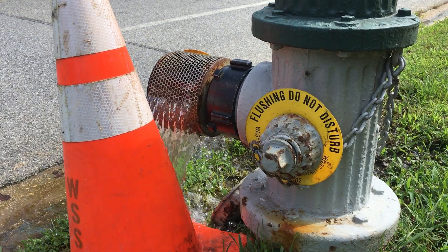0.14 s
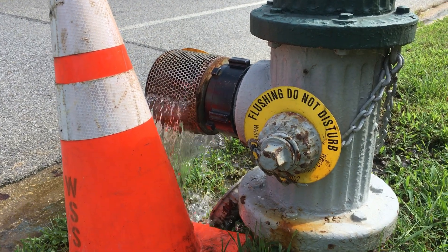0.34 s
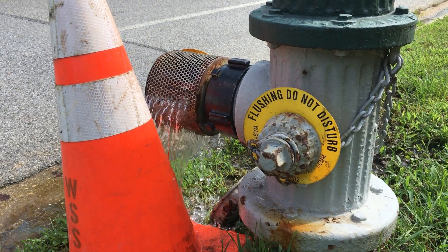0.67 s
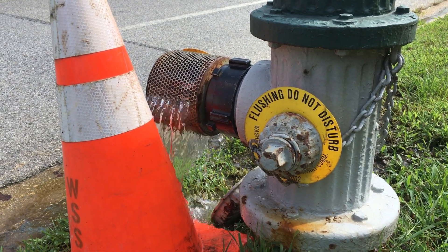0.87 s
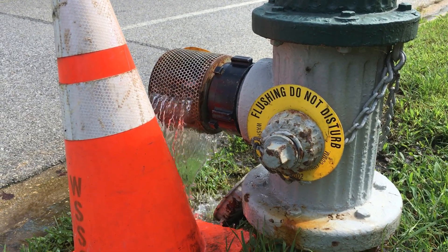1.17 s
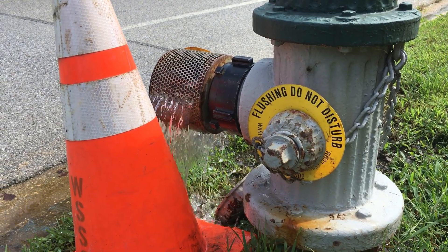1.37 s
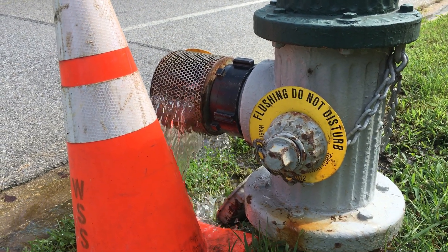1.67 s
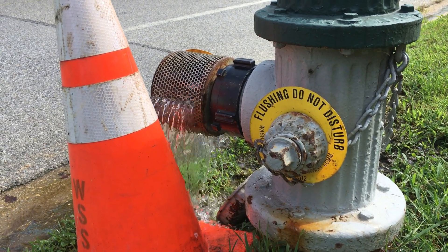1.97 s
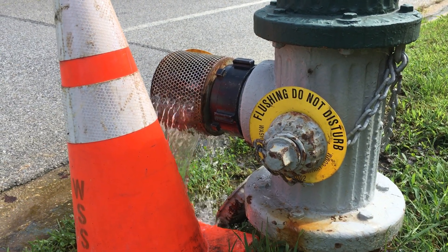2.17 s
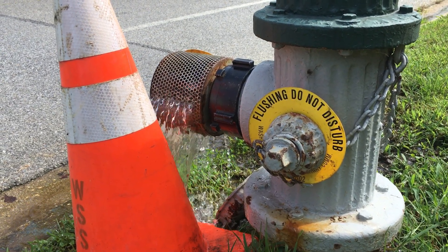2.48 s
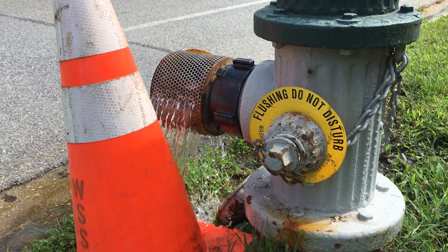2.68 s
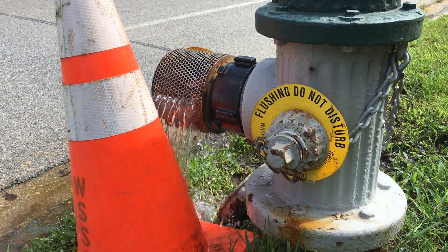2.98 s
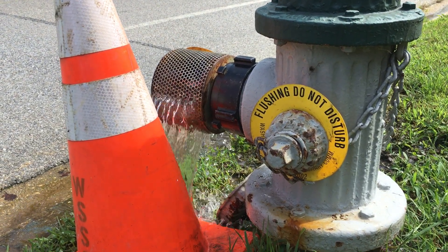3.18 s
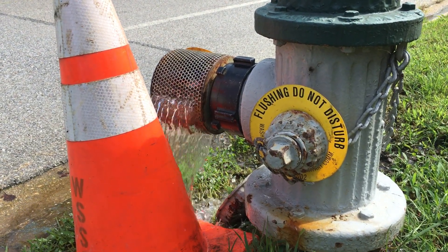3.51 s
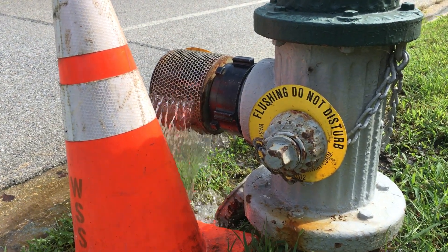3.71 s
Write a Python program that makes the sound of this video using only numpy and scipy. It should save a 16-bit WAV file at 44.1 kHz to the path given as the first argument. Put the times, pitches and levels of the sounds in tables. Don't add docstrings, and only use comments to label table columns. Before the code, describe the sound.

Water rushes steadily from a mesh-capped iron hydrant for nearly four seconds, close to a mono microphone outdoors. Turbulence gives a hollow, metallic ringing around a bright, flickering hiss. Fine droplets tick densely and larger drops crackle throughout, more sparsely after 3.1. Faint bubble pops come near 1.3 and 3.0. Low wind bumps peak around 1.8-2.1, then fade, over a very quiet distant hum.

```python
import sys
import numpy as np
from scipy import signal
from scipy.fft import rfft, irfft, next_fast_len
from scipy.io import wavfile
from scipy.ndimage import uniform_filter1d

SR = 44100
rng = np.random.default_rng(int(sys.argv[2]) if len(sys.argv) > 2 else 0)


def attenuation_scalar(level_db):
    decades = np.asarray(level_db, float) / 20
    return 10 ** decades


def unload_wav(signal):
    wavfile.write(
        sys.argv[1],
        SR,
        np.round(np.clip(np.atleast_2d(signal).T, -1, 1) * 32767).astype(np.int16),
    )


N = 169785


def evened(x):
    return x / np.sqrt(np.mean(x ** 2) + 1e-20)


def noise():
    return rng.standard_normal(N)


def curve(points):
    t_s, value = np.transpose(points)
    return np.interp(np.arange(N) / SR, t_s, value)


def colour(x, gain):
    size = next_fast_len(len(x))
    f_hz = np.fft.rfftfreq(size, 1 / SR)
    return irfft(rfft(x, size) * gain(f_hz), size)[:len(x)]


def table(points):
    f_hz, level_db = np.transpose(points)
    log_f = np.log(np.r_[f_hz[0] / 2, f_hz, f_hz[-1] * 1.5])
    level_db = np.r_[level_db[0] - 30, level_db, level_db[-1] - 24]
    return lambda hz: attenuation_scalar(np.interp(np.log(hz + 1), log_f, level_db))


def drift(top_hz, low_hz):
    count, stride = 8192, 32
    hz = np.fft.rfftfreq(count, stride / SR)
    gain = hz / (hz + low_hz) / np.sqrt(hz + 1) / (1 + (hz / top_hz) ** 4)
    slow = irfft(rfft(rng.standard_normal(count)) * gain)
    return evened(np.interp(np.arange(N) / stride, np.arange(count), slow))


def add(mix, t_s, sound):
    part = mix[round(t_s * SR):][:len(sound)]
    part += sound[:len(part)]


def hum():
    # [f/Hz, level/dB]
    hum_colour = [(60, -6.5), (130, -2), (210, -3.5), (280, -12), (330, -9.5), (390, -16), (480, -12),
                  (560, -17.5)]
    return attenuation_scalar(-61.5) * evened(colour(noise(), table(hum_colour)))


def breeze():
    # [t/s, level/dB]
    breeze_level = [(0, -56), (.3, -54.5), (.6, -51), (.9, -55.5), (1.1, -58), (1.25, -53.5), (1.42, -53),
                    (1.55, -49.5), (1.8, -53.5), (1.85, -41), (2.0, -43.5), (2.09, -56), (2.12, -58),
                    (2.28, -53), (2.37, -58), (2.85, -53.5), (3.15, -57), (3.85, -59.5)]
    # [f/Hz, density/dB per Hz]
    rumble_colour = [(15, -6), (40, -2.5), (80, -6), (130, -11), (200, -19.5), (300, -25.5)]
    lumps_db, lumps_hz, steadiness = 1.5, 25, 0.66
    rumble = evened(colour(noise(), table(rumble_colour)))
    rumble /= (uniform_filter1d(rumble ** 2, size=2500) + 0.039) ** (steadiness / 2)
    return evened(rumble) * attenuation_scalar(curve(breeze_level) + lumps_db * drift(lumps_hz, low_hz=5 * 0.084))


def eddies():
    # [t/s, peak level/dB, swing rate/Hz, length/s]
    eddy_events = [(0.287, -48.5, 70, 0.043), (.575, -43.5, 45.5, .05), (.835, -42, 93, 0.024),
                   (0.917, -48.5, 60, 0.041), (1.21, -42, 50, .05), (1.521, -44, 71, 0.033),
                   (1.58, -42.5, 59.4, .035), (1.657, -43, 70, 0.033), (1.725, -41, 70, .03),
                   (1.799, -44, 163, .022), (1.818, -30, 85, 0.027), (1.83, -30, 202, .026),
                   (1.856, -34, 55, 0.026), (1.866, -36, 45, 0.0255), (1.897, -33.5, 108, 0.0201),
                   (1.93, -35.5, 50, 0.032), (1.955, -34, 60, 0.0245), (1.981, -30, 101, 0.0218),
                   (2.001, -37.5, 80, 0.0212), (2.025, -40, 70, 0.031), (2.058, -36.5, 129, .018),
                   (2.072, -37.5, 55, .024), (2.23, -40.5, 60, 0.041), (2.275, -36.5, 69, .03),
                   (2.305, -40, 81, .03), (2.433, -46, 59.6, 0.027), (2.513, -45, 59.5, 0.03),
                   (2.63, -38.5, 44.5, 0.036), (2.836, -52, 59.5, 0.038), (2.985, -44.5, 54.7, 0.04)]
    quicken, roughness, peak_power = 1.8, 0.16, 0.69
    overtone_db, overtone_ratio = -3, 1.62
    out = np.zeros(N)
    for t_s, peak_db, swing_hz, length_s in eddy_events:
        u = np.arange(0, length_s, 1 / SR) / length_s
        wobble = evened(uniform_filter1d(rng.standard_normal(4000), size=300))[:len(u)]
        rate_hz = swing_hz * quicken ** (2 * u - 1) * np.exp(roughness * wobble)
        phase = 2 * np.pi * (np.cumsum(rate_hz) / SR - swing_hz * length_s / 2)
        swing = np.cos(phase) + attenuation_scalar(overtone_db) * u * np.cos(overtone_ratio * phase)
        envelope = np.sin(np.pi * u ** peak_power) ** 2
        add(out, t_s, -attenuation_scalar(peak_db) * envelope * swing)
    return out


def bubbles():
    # [t/s, peak level/dB, pitch/Hz]
    bubble_events = [
        (1.270, -46, 3300),
        (1.424, -56, 3400),
        (2.29, -56, 3360),
        (3.04, -51, 3380),
    ]
    decay_s, rise, trim_db = 0.0017, 0.1, -5
    out = np.zeros(N)
    u = np.arange(900) / SR / decay_s
    for t_s, peak_db, pitch_hz in bubble_events:
        turns = pitch_hz * decay_s * u * (1 + rise * (u - 2) / 10)
        ping = u * np.exp(1 - u) * np.sin(2 * np.pi * turns)
        add(out, t_s, attenuation_scalar(peak_db + trim_db) * ping)
    return out


def splats():
    # [t/s, peak level/dB, pitch/Hz]
    splat_events = [(0.0223, -33.5, 12700), (0.087, -27, 11800), (0.2249, -28, 8900), (0.3037, -28, 13200),
                    (0.4509, -32, 12000), (0.5811, -37, 11400), (0.8694, -43, 10900),
                    (0.9394, -31.5, 11500), (1.1288, -35, 11500), (1.2391, -27, 11600), (1.4096, -33, 9400),
                    (1.5708, -34, 11300), (1.6773, -36, 7770), (1.701, -32.5, 10900),
                    (1.8094, -33.5, 11300), (2.1146, -42, 11600), (2.2074, -30, 11600), (2.236, -31, 9350),
                    (2.381, -31, 9350), (2.4084, -34, 11600), (2.4645, -30, 11100), (2.6493, -31.5, 10500),
                    (2.73, -38, 7860), (2.8848, -26, 11100), (2.9377, -36, 12600), (2.946, -28, 11200),
                    (2.996, -29, 11800), (3.0804, -35, 11900), (3.4201, -36, 11600), (3.6112, -36, 9180)]
    decay_s, width_hz, trim_db = 0.00084, 2250, -10.5
    out, t = np.zeros(N), np.arange(400) / SR
    for t_s, peak_db, pitch_hz in splat_events:
        crackle = colour(rng.standard_normal(400), lambda f: np.exp(-((f - pitch_hz) / width_hz) ** 2))
        burst = crackle * t * np.exp(-t / decay_s)
        add(out, t_s, attenuation_scalar(peak_db + trim_db) * burst / abs(burst).max())
    return out


def droplets():
    # [f/Hz, level/dB]
    drop_colour = [(4000, -23), (6500, -22), (8500, -7.5), (10000, -8), (11500, -3), (13200, -6.5),
                   (15500, -42)]
    drops_per_s, spread_db, clump_db = 2200, 4, 4
    pitches_hz, decay_cycles = np.geomspace(7000, 15400, 24), 3.7 * 0.87
    scatter_db, scatter_s = -4, 0.003
    spread = np.minimum(rng.exponential(1, N), 4.5)
    strike = attenuation_scalar(spread_db * spread + clump_db * drift(120, low_hz=5))
    strike *= rng.random(N) < drops_per_s / SR
    kind = rng.integers(0, len(pitches_hz), size=N)
    drops = np.zeros(N)
    for k, hz in enumerate(pitches_hz):
        turns = np.arange(200) * hz / SR
        tick = (1 - np.exp(-turns)) * np.exp(-turns / decay_cycles) * np.sin(2 * np.pi * turns)
        drops += signal.oaconvolve(strike * (kind == k), tick)[:N]
    spatter = rng.standard_normal(800) * np.exp(-np.arange(800) / SR / scatter_s)
    spatter = evened(spatter) / np.sqrt(800)
    drops += attenuation_scalar(scatter_db) * signal.oaconvolve(drops, spatter)[:N]
    return evened(colour(drops, table(drop_colour)))


def jet():
    # [t/s, level/dB]
    flow = [(0.0, -58.5), (1.35, -59), (2.68, -57.5), (2.87, -59.5), (2.88, -58), (2.91, -59),
            (2.94, -57.5), (3.07, -60), (3.85, -58)]
    # [f/Hz, density/dB per Hz]
    hiss_colour = [(2500, -22), (4000, -12.5), (5800, -8.5), (7800, -3.5), (10100, -8), (11400, -2.5),
                   (13400, -5), (14300, -8)]
    hiss_db, flicker_db, drops_db = -1, 1.24, -3
    flicker = attenuation_scalar(flicker_db * drift(50, low_hz=2.8))
    hiss = evened(colour(noise() * flicker, table(hiss_colour)))
    return attenuation_scalar(curve(flow)) * (attenuation_scalar(hiss_db) * hiss + attenuation_scalar(drops_db) * droplets())


def iron():
    # [f/Hz, width/Hz, level/dB]
    iron_modes = [(530, 120, -16.5), (620.4, 15, -12), (692.5, 8.8, -7), (742.4, 28.3, -10.5), (978, 20.8, 2),
                  (1073, 174, -17), (1207, 68, -9), (1289, 61, -5.5), (1540, 100, -29), (840, 90, -24),
                  (1790, 110, -24.5), (1950, 35, -16.5), (2203, 82, -13), (2425, 150, -14.5),
                  (2689, 34, -11.5), (2752, 51, -15), (2830, 29, -5), (2983, 27, -11), (3064, 120, -17),
              (3380, 140, -20), (3785, 137, -21), (4306, 250, -23), (4720, 310, -26.5), (4896, 220, -15.5),
              (5244, 210, -24.5), (6300, 150, -24), (7750, 260, -22.5), (9180, 700, -24)]
    ring_db, surge_db, surge_hz, shared = -53, 1.36, 21, 0.49
    skirt, settle = 1.35, 0.5
    together, out = drift(surge_hz, low_hz=6.7), np.zeros(N)
    for mode_hz, width_hz, level_db in iron_modes:
        alone = drift(surge_hz, low_hz=2.3)
        push = noise() * attenuation_scalar(surge_db * (shared * together + (1.5 - shared) * alone))
        ring = colour(push, lambda f: (1 + (2 * (f - mode_hz) / width_hz) ** 2) ** (-skirt / 2))
        swell = uniform_filter1d(ring ** 2, size=6000) / np.mean(ring ** 2)
        out += attenuation_scalar(level_db) * ring / (swell + 0.05) ** (settle / 2)
    return attenuation_scalar(ring_db) * evened(out)


def scene():
    mix = hum() + breeze() + eddies() + bubbles() + splats() + jet() + iron()
    return mix[None]


def band_limit(x):
    return signal.sosfilt(signal.butter(12, 15710, fs=SR, output="sos"), x)


def record(dry):
    bass_cut = signal.butter(2, 22, "high", fs=SR, output="sos")
    top_cut = signal.firwin(801, 15790, window=("kaiser", 9), fs=SR)
    mix = signal.oaconvolve(signal.sosfilt(bass_cut, dry), top_cut[None], "same")
    return band_limit(mix)


dry = scene()
out = record(dry)
unload_wav(out)
```